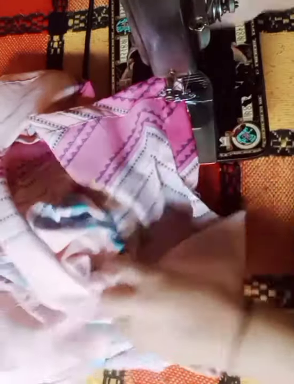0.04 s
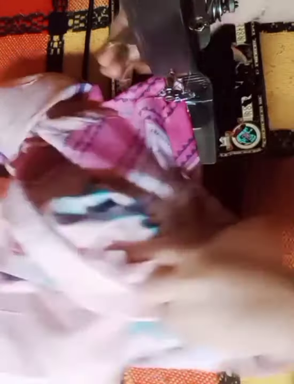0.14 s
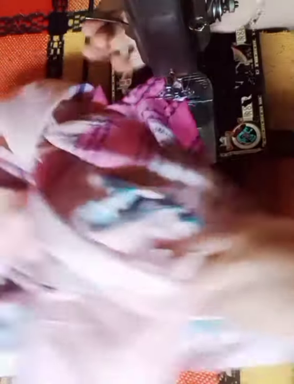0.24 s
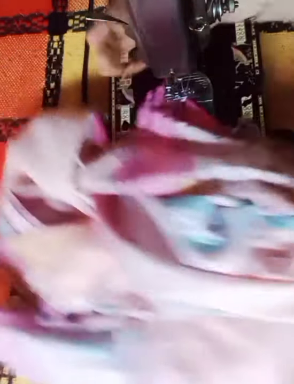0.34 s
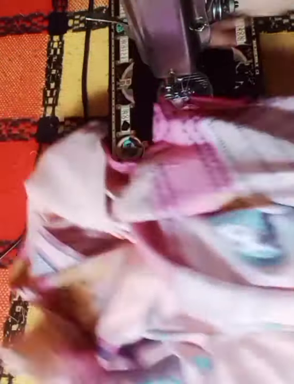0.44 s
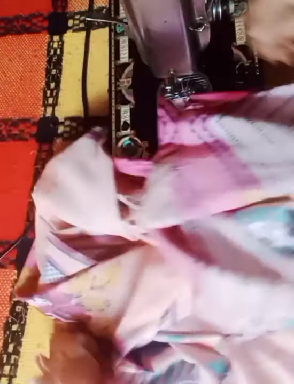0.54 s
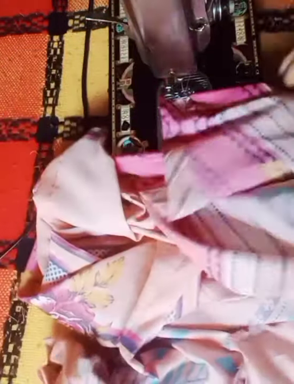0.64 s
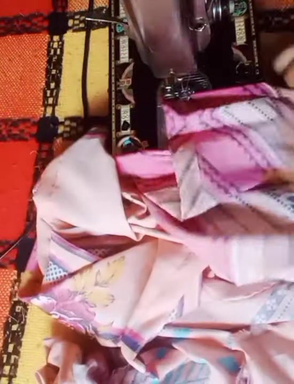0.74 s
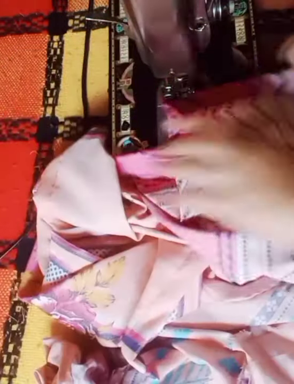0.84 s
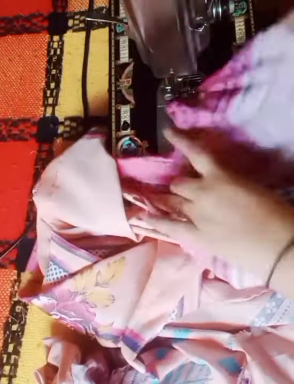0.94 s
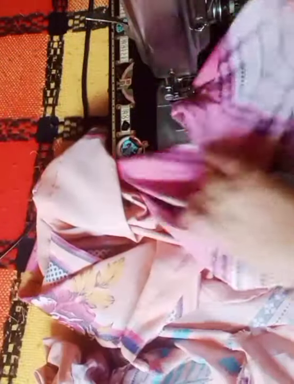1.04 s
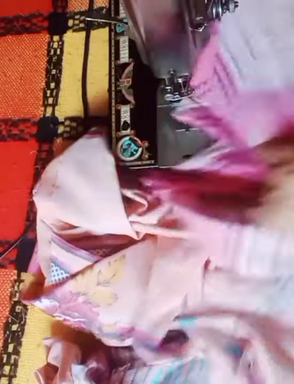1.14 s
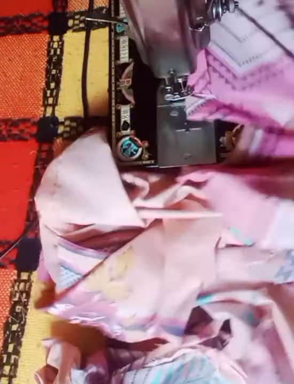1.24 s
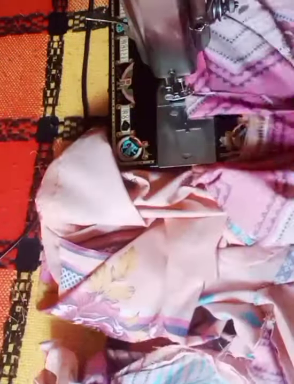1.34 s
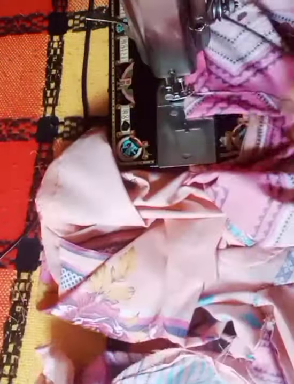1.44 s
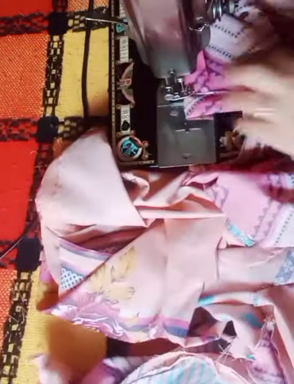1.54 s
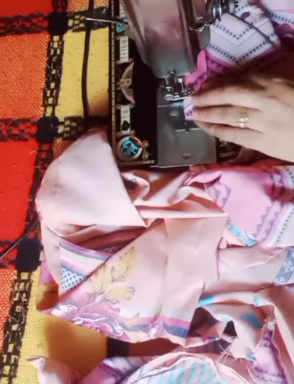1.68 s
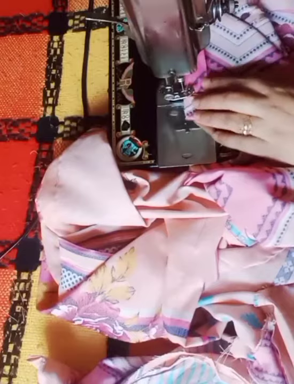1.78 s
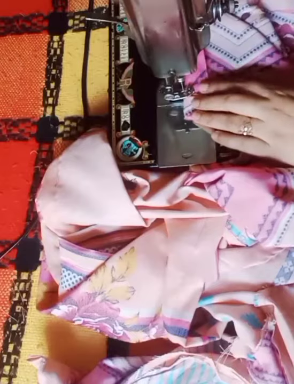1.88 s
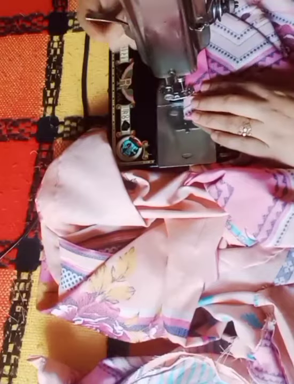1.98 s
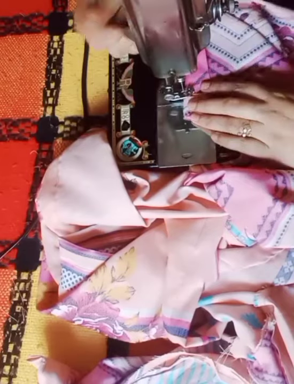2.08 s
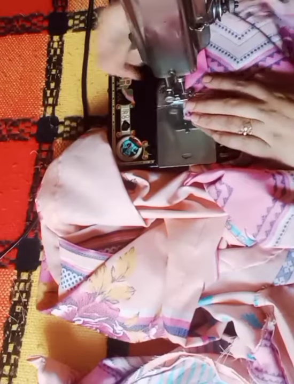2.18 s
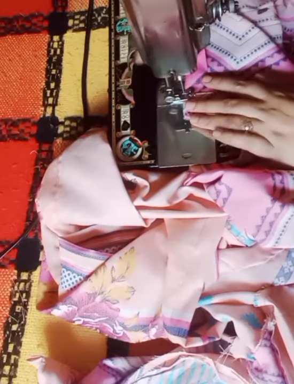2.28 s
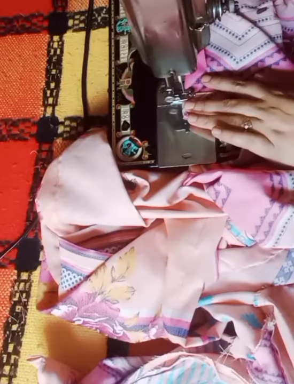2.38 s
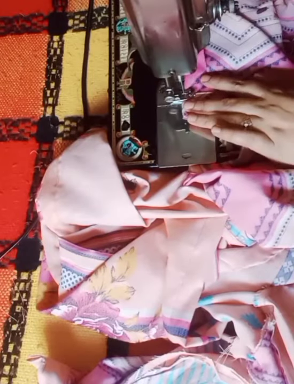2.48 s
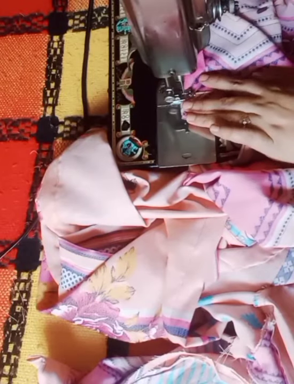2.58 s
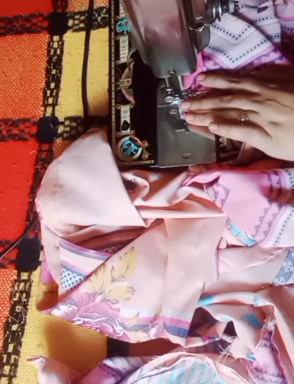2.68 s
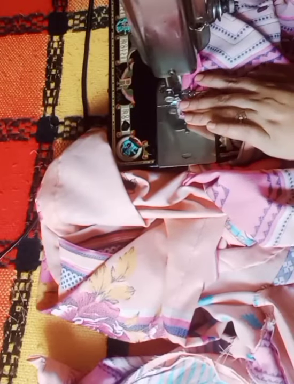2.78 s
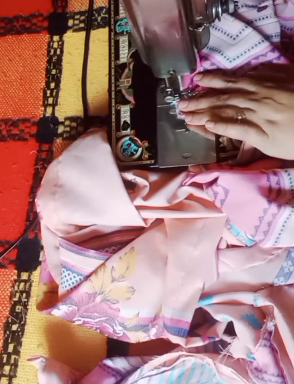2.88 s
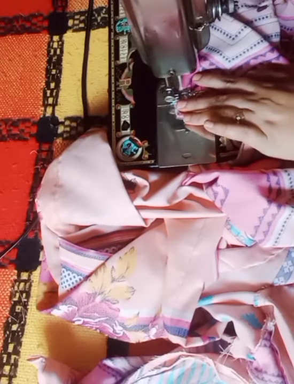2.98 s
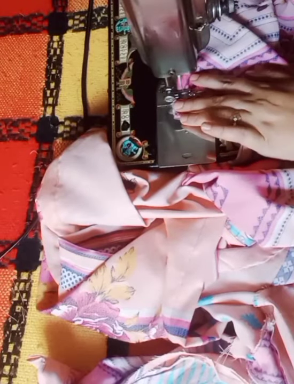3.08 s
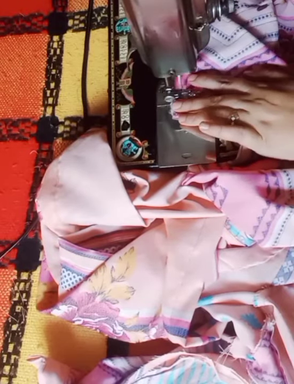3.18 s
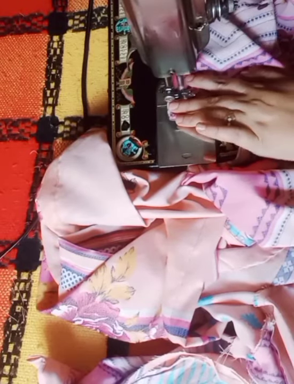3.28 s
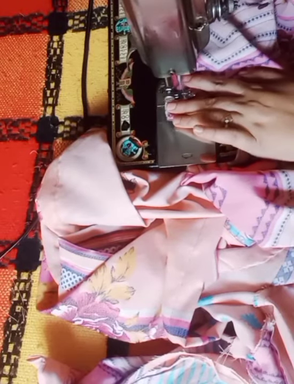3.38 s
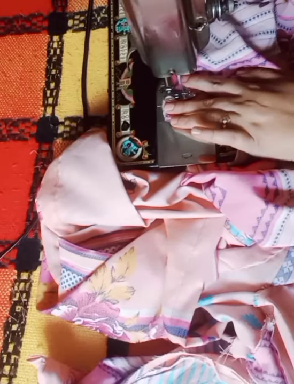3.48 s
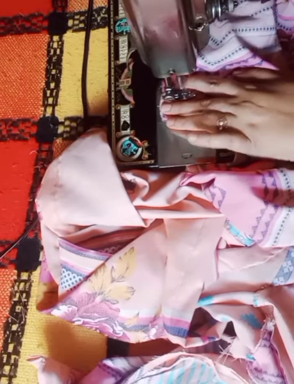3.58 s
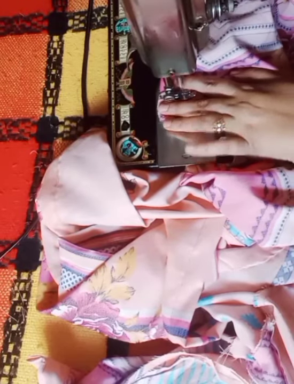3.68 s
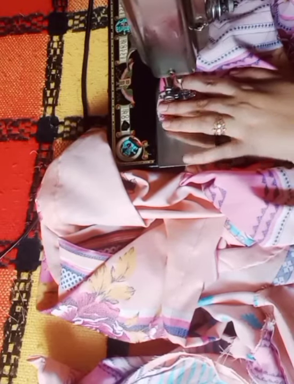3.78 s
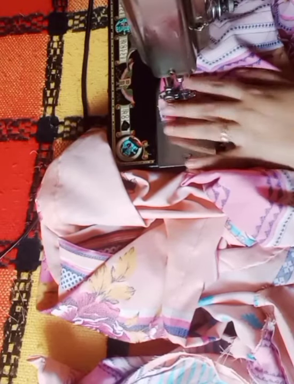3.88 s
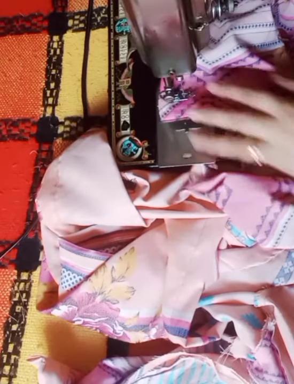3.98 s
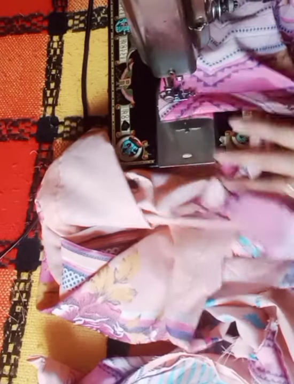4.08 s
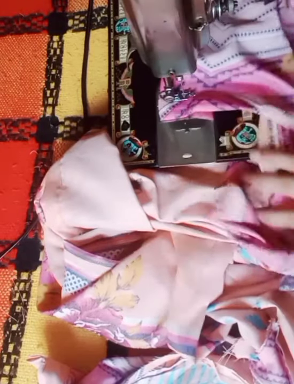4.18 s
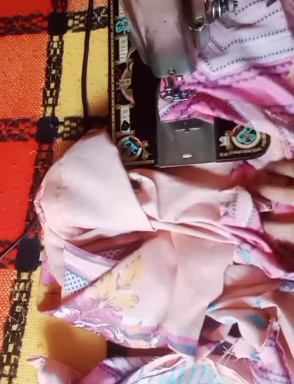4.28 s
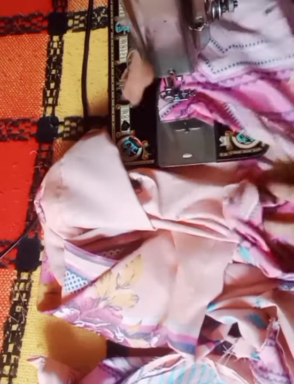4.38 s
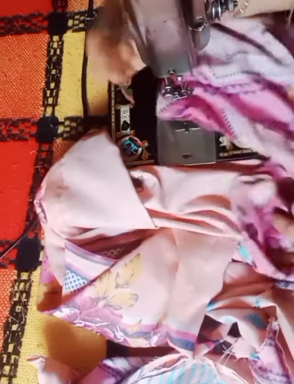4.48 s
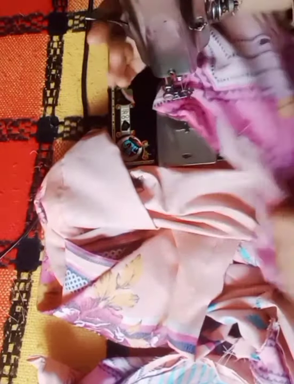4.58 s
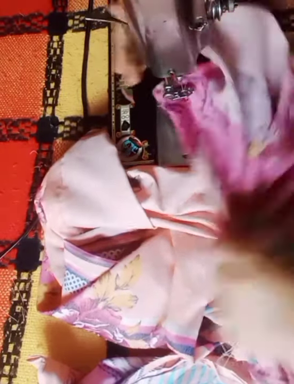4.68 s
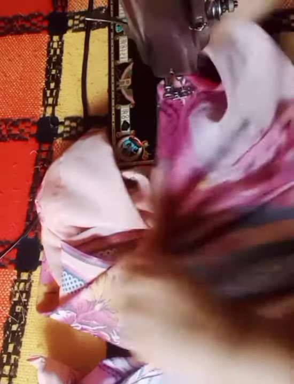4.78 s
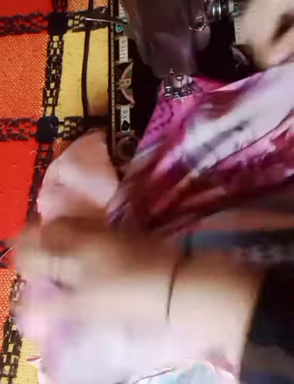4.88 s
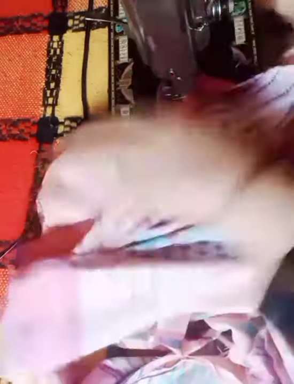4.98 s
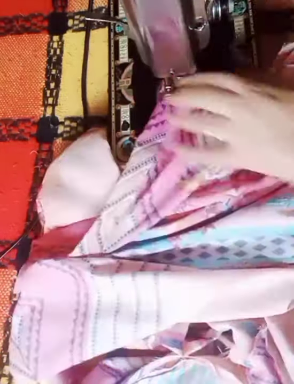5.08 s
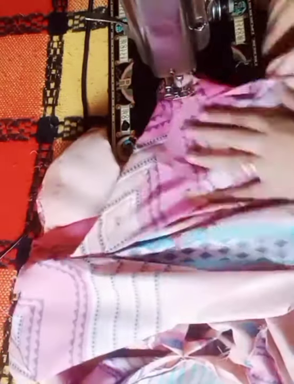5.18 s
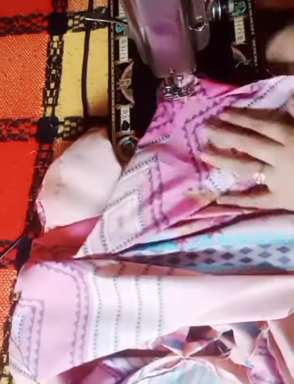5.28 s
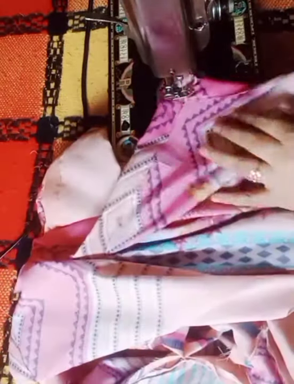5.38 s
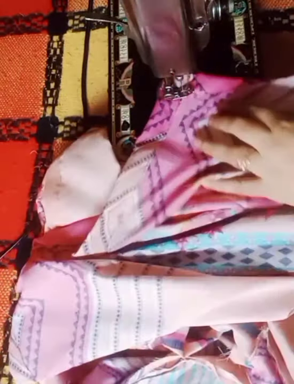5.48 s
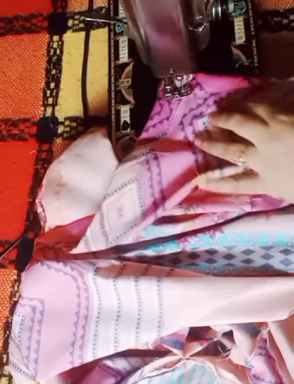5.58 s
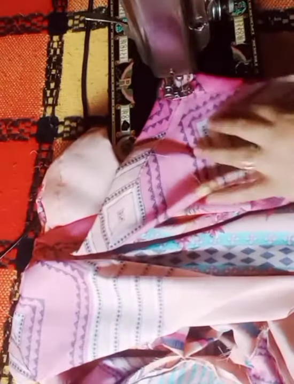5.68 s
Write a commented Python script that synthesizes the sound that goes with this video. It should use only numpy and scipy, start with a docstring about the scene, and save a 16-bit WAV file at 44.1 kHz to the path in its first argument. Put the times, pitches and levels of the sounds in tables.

```python
"""A presser foot clacks over the steady hum of a fan; faint, brief swells of high hiss follow. Dry steel
scrapes and squeaks as the wheel of an old iron sewing machine starts. In one short seam the stitches
speed up and coast to rest, steel striking steel and thumping the cloth-covered board below.
The foot clacks again. Small room, one mono microphone close to the machine."""
import sys
import numpy as np
from scipy import signal
from scipy.fft import rfft, irfft, next_fast_len
from scipy.io import wavfile
from scipy.ndimage import uniform_filter1d, map_coordinates

SR = 44100
rng = np.random.default_rng(int(sys.argv[2]) if len(sys.argv) > 2 else 0)


def dump_mix(stems):
    """Bounce the given channels to the path in sys.argv[1] as a 16-bit WAV at rate SR."""
    frames = np.atleast_2d(stems).T  # one column per channel
    limited = np.clip(frames, -1, 1)  # hard clip at full scale
    pcm = np.round(limited * 32767).astype(np.int16)
    wavfile.write(sys.argv[1], SR, pcm)


N = 253134

# modes of the board under the machine: f/Hz, level/dB, t60/s
BOARD_MODES = [(114.2, -11, 0.16), (181.9, -3, 0.41), (199.6, 0, 0.094), (221, -10, 0.076),
               (269.5, -5, 0.1), (300, -2.5, 0.2), (314, -7.5, 0.082), (461, -15, 0.15),
               (555, -18.5, 0.082)]
# the shaft runs up, then coasts: t/s, stitch rate/Hz
SHAFT_SPEED = [(2.2, 4.0), (2.33, 8.4), (2.65, 17.3), (2.88, 16.71), (3.2, 14.18), (3.4, 14.36),
               (3.5, 11.3), (3.62, 11.77), (3.85, 2.0)]
# how hard the works are driven: t/s, level/dB re full drive
DRIVE_LEVEL = [(2.2, -29), (2.45, -10.5), (2.68, -6), (2.85, 0), (3.1, 0), (3.22, -5.5), (3.45, -6),
               (3.61, -13), (3.8, -36)]


def stitching():
    """Each turn of the shaft makes a round of steel contacts, which ring the plate and thump the board."""
    # needle bar, its rebound, shuttle, feed dog: position/turns, clack level/dB, thump level/dB
    contacts = [(0.0, 1.5, -4.5), (0.122, -1.5, -3.5), (.38, -26, -11), (.68, -6, -14)]
    # spectrum of steel on steel: f/Hz, level/dB
    clack_spectrum = [(50, -60), (250, -42), (500, 2.5), (900, 4), (1550, -21), (1900, 5), (2900, 2.5),
                      (3800, 3), (4500, -5), (5150, -14.5), (6200, -3.5), (7400, 2), (8800, -11),
                      (12000, -14.5), (15300, -8.5)]
    # resonances of the needle plate and arm: f/Hz, width/Hz, level/dB
    plate_peaks = [(673, 71, -3), (805, 100, -2), (870, 50, 3), (1003, 24, -13), (1430, 180, -6),
                   (1900, 23, 4), (2210, 99, -0.5), (2506, 46, 0.5), (3200, 260, -2.5), (7580, 280, -8),
                   (9750, 110, -15)]
    clacks, knocks, thumps = np.zeros((3, N))
    turns = np.cumsum(curve(SHAFT_SPEED) * turning()) / SR
    turns -= turns[round(3.0913 * SR)]  # the needle bar strikes at this moment
    drive_db = curve(DRIVE_LEVEL)
    for position, steel_db, wood_db in contacts:
        for i in np.flatnonzero(np.diff(np.floor(turns - position)) > 0):
            at = i / SR
            steel_gain = amp(-17 + drive_db[i] + steel_db + 1.2 * rng.standard_normal())
            wood_gain = amp(-14.5 + .55 * drive_db[i] + wood_db + 2.2 * rng.standard_normal())
            add(clacks, at - .001, steel_gain * burst(attack=.0037, t60=.034))
            add(knocks, at - .002, steel_gain * burst(attack=.0011, t60=.063))
            add(thumps, at, wood_gain * ring(BOARD_MODES, attack=.00089))
    # play in the joints breaks each clack into tiny taps
    rattle = unit(noise(clack_spectrum) * amp(2.7 * wobble(600)))
    return amp(-5) * clacks * rattle + amp(-8) * knocks * resonant_noise(plate_peaks) + thumps


def running_gear():
    """Bearings and links chatter and keep the board trembling; its lowest mode swells at full drive."""
    # spectrum of the bearings and links: f/Hz, level/dB
    whirr_spectrum = [(240, -58), (400, -4.5), (466, -1), (519, -15), (886, -8), (1080, -8.5), (1660, -16),
                      (1910, -6), (2320, -11), (3210, -11), (3790, -12.5), (5230, -33), (7440, -14),
                      (9210, -30), (15500, -36)]
    t, drive_db = np.arange(N) / SR, curve(DRIVE_LEVEL)
    chatter = unit(noise(whirr_spectrum) * amp(1.9 * wobble(130) + .73 * wobble(500)))
    tremble = resonant_noise([(hz, np.log(1000) / (np.pi * t60), db) for hz, db, t60 in BOARD_MODES])
    boom = unit(np.sin(2 * np.pi * 106 * t + .56 * wobble(10)) * amp(2.5 * wobble(12)))
    return turning() * (amp(-26.7 + .85 * drive_db) * chatter
                        + amp(-22 + .85 * drive_db) * tremble
                        + amp(-31 + 1.2 * drive_db) * boom)


def wheel_scrape():
    """Dry steel rubs and squeaks, and the rim sings, until the wheel runs freely."""
    # resonances of the rubbed steel: f/Hz, width/Hz, level/dB
    steel_peaks = [(2120, 170, 3.5), (2800, 190, -7), (2940, 130, 5), (3460, 110, -1.5), (3750, 70, -1),
                   (3750, 76, 0), (3940, 35, 1), (4200, 710, -15), (7230, 92, -13), (7230, 900, -8.5),
                   (15500, 2700, -15)]
    # the steel grabs and squeaks: t/s, f/Hz, width/Hz, level/dB, half-length/s
    squeaks = [(2.302, 3670, 400, -27, .028), (2.32, 2720, 300, -26, .026), (2.382, 2187, 22, -18, .023),
               (2.385, 3700, 600, -21.5, .032), (2.388, 9300, 600, -30, .02), (2.47, 4450, 450, -28, .014),
               (2.472, 5750, 800, -30, .027), (2.503, 2772, 250, -18.5, .014),
               (2.54, 4310, 400, -26.5, .016), (2.623, 3850, 350, -20, .01)]
    t = np.arange(N) / SR
    rub = unit(resonant_noise(steel_peaks) * amp(2.4 * wobble(90)))
    waver = amp(2.2 * wobble(70) + 2.5 * wobble(25))
    rim = waver * np.sin(2 * np.pi * 2882 * t + 1.2 * wobble(90))
    scrape = rub * swell(peak_s=2.37, peak_db=-21.3, rise=200, fall=32, end_s=2.72)
    scrape += rim * swell(peak_s=2.43, peak_db=-25, rise=150, fall=17, end_s=2.73)
    for at, hz, width, db, half_s in squeaks:
        # the slip is unsteady: the faster its phase wanders, the wider the squeak
        slip = np.sin(2 * np.pi * hz * t + 1.36 * wobble(width))
        flutter = amp(2.3 * wobble(width) + 2.6 * wobble(120))
        scrape += amp(db) * bell_curve(at, half_s) * slip * flutter
    return scrape


def presser_foot():
    """The lever slides over its cam and snaps, the bar strikes its stop, and the base answers."""
    # foot up or down: t/s, then level/dB of snap, lever, bar, base thud, its lowest mode (re usual)
    moves = [(0.1471, -29, -39, -36, -22, -6), (0.2169, -25, -38, -30, -25.5, -2),
             (2.1315, -27, -38, -50, -17.5, -14), (2.1829, -25, -50, -45, -24.5, -10),
             (4.4249, -28.5, -30, -36, -19.5, -16), (4.4907, -26, -27, -29, -26.5, 2)]
    # modes of the lever: f/Hz, level/dB, t60/s
    lever_modes = [(2605, -7, 0.022), (2600, -9, 0.023)]
    # spectrum of the lever's snap: f/Hz, level/dB
    snap_spectrum = [(40, -34), (300, 18), (900, 9), (1700, 3.5), (4300, 6.5), (5200, -5), (6300, 3),
                     (7600, 6), (10000, -6), (12000, -11), (15000, -5)]
    # resonances of the presser bar: f/Hz, width/Hz, level/dB
    bar_peaks = [(3250, 230, -3.5), (3760, 130, 8), (3930, 100, -3), (4250, 130, -14), (4510, 83, 5)]
    snaps, bar, lever, base = np.zeros((4, N))
    slide = burst(attack=.0003, t60=.11)[::-1]  # friction swells up to the snap
    for at, snap_db, lever_db, bar_db, thud_db, lowest_db in moves:
        add(snaps, at - len(slide) / SR + .0018, amp(snap_db - 16) * slide)
        add(snaps, at, amp(snap_db) * burst(attack=.0012, t60=.027))
        add(bar, at, amp(bar_db) * burst(attack=.002, t60=.026))
        add(lever, at, amp(lever_db) * ring(lever_modes, attack=.0023))
        add(base, at + .005, base_thud(thud_db, lowest_db))
    snapping = amp(-1.5) * snaps * noise(snap_spectrum)
    ringing = amp(3.5) * (bar * resonant_noise(bar_peaks) + lever)
    return snapping + ringing + base


def base_thud(db, lowest_db):
    """One knock of the iron base; where the blow lands decides how much its lowest mode joins in."""
    # modes of the base on its seat: f/Hz, level/dB, t60/s
    base_modes = [(109.1, -15.5, 0.52), (146, -3, 0.09), (177, -1.5, 0.12), (187, -5, 0.11),
                  (427, -10, 0.062), (850, -17, 0.027)]
    (hz, level, t60), *upper = base_modes
    return amp(db) * ring([(hz, level + lowest_db, t60)] + upper, attack=.004)


def low_thumps():
    """Heavier low thumps on some stitches, and one soft knock near the end."""
    # thumps: t/s, level/dB, lowest mode/dB re usual
    bumps = [(2.43, -22, -10), (2.699, -13, -8), (3.092, -18, -4), (3.369, -18, -3), (3.695, -27, -10),
             (4.909, -32.5, -10)]
    thumps = np.zeros(N)
    for at, db, lowest_db in bumps:
        add(thumps, at, base_thud(db, lowest_db))
    return thumps


def hiss_swells_and_tick():
    """Faint, brief swells of high hiss before the seam, and one faint tick near the end."""
    # swells of hiss: t/s, level/dB
    swells = [(.98, -60), (1.2, -61), (1.7, -64)]
    # spectrum of the high hiss: f/Hz, level/dB
    swell_spectrum = [(2000, -20), (6500, 0), (9000, -2), (15000, -6)]
    envelope = sum(amp(db) * bell_curve(at, half_s=.05) for at, db in swells)
    hiss = unit(noise(swell_spectrum) * amp(3 * wobble(200)))
    tick = np.zeros(N)
    add(tick, 4.756, amp(-48) * burst(attack=.002, t60=.04))
    return envelope * hiss + tick * resonant_noise([(7300, 700, 0)])


def fan():
    """Air rushes in uneven patches over a wavering motor hum and a thin hiss."""
    # partials of the motor hum: f/Hz, relative level/dB
    partials = [(101, -53.5), (202, -47.5), (302, -45), (404, -50)]
    # spectrum of the rushing air: f/Hz, level/dB
    air_spectrum = [(25, -16), (45, -10), (66, -1.5), (80, -12.5), (115, 5), (160, -0.5), (235, -1),
                    (400, 1.5), (590, -0.5), (720, -4.5), (880, -2), (1400, -4.5), (1900, -11.5),
                    (3300, -14.5), (5000, -37)]
    # spectrum of the steady hiss: f/Hz, level/dB
    hiss_spectrum = [(1500, -32), (3500, 7.5), (5200, -9), (6800, 4.5), (7600, 7), (9000, -6), (11500, -23),
                     (13500, -20), (15400, -9)]
    t, hum = np.arange(N) / SR, np.zeros(N)
    for hz, db in partials:
        hum += amp(db + 1.8 * wobble(9)) * np.sqrt(2) * np.sin(2 * np.pi * hz * t + .7 * wobble(8))
    bands = signal.stft(noise(air_spectrum), nperseg=512)[2]
    patches = uniform_filter1d(rng.standard_normal(bands.shape), size=7, axis=0)  # smooth in frequency
    patches = unit(uniform_filter1d(patches, size=12, axis=1))  # and in time
    air = unit(signal.istft(bands * amp(1.3 * patches), nperseg=512)[1][:N])
    return amp(-40.5) * air + amp(-6) * hum + amp(-58) * noise(hiss_spectrum)


def room(x):
    """The near walls answer after 5 ms; each frequency dies at its own speed."""
    # decay of the small room: f/Hz, t60/s
    decay = [(150, 0.27), (1000, 0.21), (4000, 0.24), (14000, 0.31)]
    hz, t, bands = signal.stft(rng.standard_normal(SR // 2), SR, nperseg=256)
    tail = signal.istft(bands * amp(-60 * t / along(decay, hz)[:, None]), SR, nperseg=256)[1]
    delayed = np.pad(x, (SR // 200, 0))
    return signal.fftconvolve(delayed, tail / np.linalg.norm(tail))[:N]


def turning():
    """True while the shaft turns."""
    t = np.arange(N) / SR
    return (t > SHAFT_SPEED[0][0]) & (t < SHAFT_SPEED[-1][0])


def ring(modes, attack):
    """One blow on an object, peak 1; each blow shares its strength among the modes anew."""
    t = np.arange(SR // 3) / SR
    blow = np.zeros(len(t))
    for hz, db, t60 in modes:
        envelope = amp(db + 2 * rng.standard_normal() - 60 * t / t60)
        blow += envelope * np.sin(2 * np.pi * hz * t + rng.standard_normal())
    blow *= (1 - np.exp(-t / attack)) ** 2
    return blow / np.abs(blow).max()


def burst(attack, t60):
    """Envelope of one contact, peak 1; times in s."""
    t = np.arange(SR // 4) / SR
    shape = (1 - np.exp(-t / attack)) * amp(-60 * t / t60)
    return shape / shape.max()


def swell(peak_s, peak_db, rise, fall, end_s, release=400):
    """A gain that climbs, sinks slowly and drops once the steel lets go; slopes in dB/s."""
    t = np.arange(N) / SR
    before, after, released = np.maximum([peak_s - t, t - peak_s, t - end_s], 0)
    return amp(peak_db - rise * before - fall * after - release * released)


def bell_curve(at, half_s):
    """A smooth rise and fall, peak 1."""
    return np.exp(-2 * ((np.arange(N) / SR - at) / half_s) ** 2)


def noise(spectrum):
    """Coloured noise of rms 1."""
    return unit(filtered(rng.standard_normal(N), lambda hz: amp(along(spectrum, hz))))


def resonant_noise(peaks):
    """Noise of rms 1 in resonances (f/Hz, width/Hz, level/dB), with dark valleys between them."""
    def response(f):
        return sum(amp(db) / (1 + ((f - hz) / (.8 * width)) ** 2) for hz, width, db in peaks)
    return unit(filtered(rng.standard_normal(N), response))


def wobble(rate):
    """A smooth random curve, rate knots a second."""
    knots = rng.standard_normal(int(N * rate / SR) + 4)
    return map_coordinates(knots, [np.arange(N) * rate / SR])


def filtered(x, response):
    """x shaped by a frequency response."""
    size = next_fast_len(N + SR // 2)
    return irfft(rfft(x, size) * response(np.fft.rfftfreq(size, 1 / SR)), size)[..., :N]


def curve(rows):
    """One value per sample from (t/s, value) rows."""
    return np.interp(np.arange(N) / SR, *np.transpose(rows))


def along(points, hz):
    """Interpolate (f/Hz, value) points on a log axis."""
    f, values = np.transpose(points)
    return np.interp(np.log(hz + 1), np.log(f + 1), values)


def add(track, at, sound):
    """Mix a sound into the track at a time in s."""
    part = track[max(round(at * SR), 0):][:len(sound)]
    part += sound[:len(part)]


def amp(db):
    """Decibels to gain."""
    return 10 ** (np.asarray(db) / 20)


def unit(x):
    """Scale to rms 1."""
    return x / np.sqrt(np.mean(x ** 2) + 1e-20)


def scene():
    """The machine close up, the room and the fan behind it, the same in both channels."""
    machine = stitching() + running_gear() + wheel_scrape() + presser_foot() + low_thumps()
    close = machine + hiss_swells_and_tick()
    mono = close + amp(-7.5) * room(close) + fan()
    return np.array([mono, mono])


def record(dry, low_hz=55, top_hz=15600):
    """The small microphone loses the deep bass, and the recorder keeps nothing above its band limit."""
    thin = signal.sosfilt(signal.butter(2, low_hz, "highpass", fs=SR, output="sos"), dry)
    return filtered(thin, lambda hz: hz < top_hz)


dry = scene()
out = record(dry)
dump_mix(out)
```